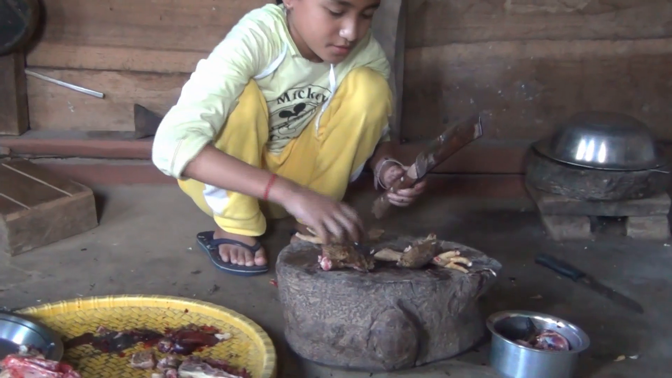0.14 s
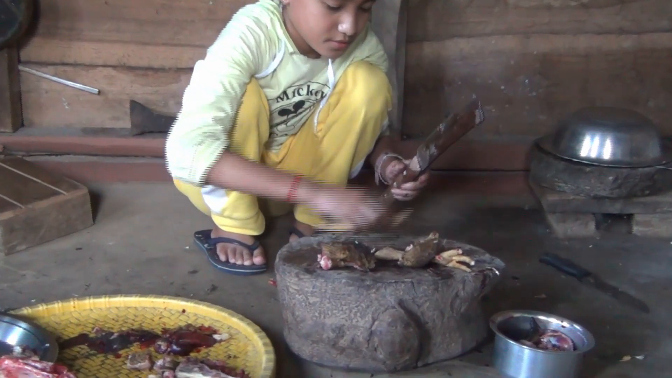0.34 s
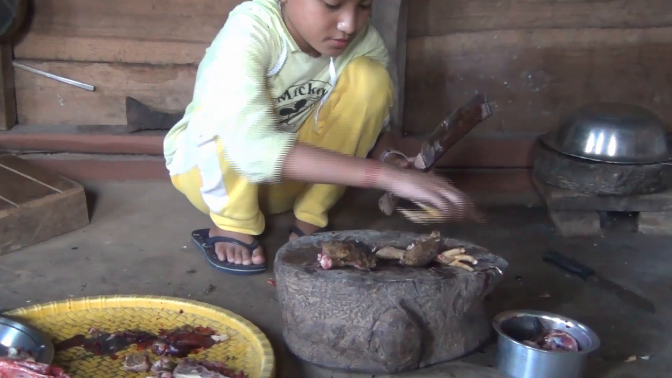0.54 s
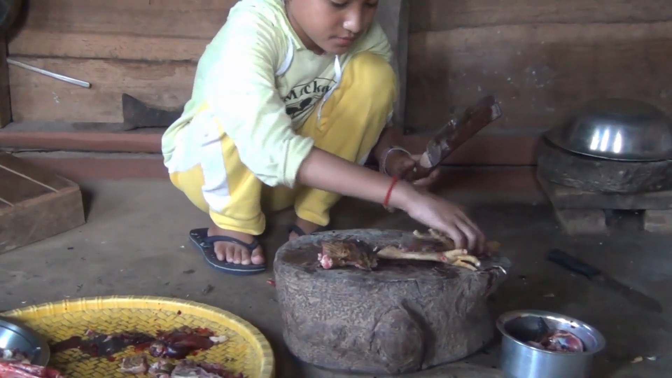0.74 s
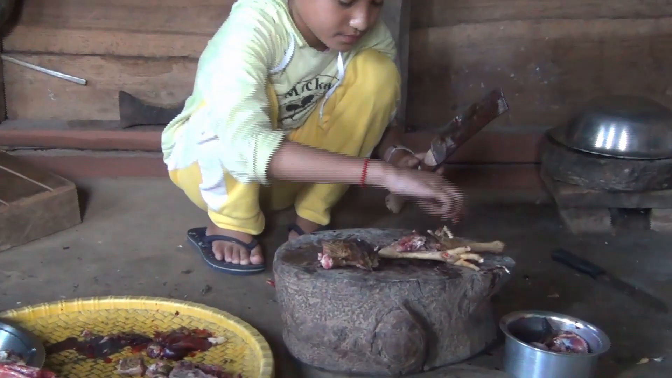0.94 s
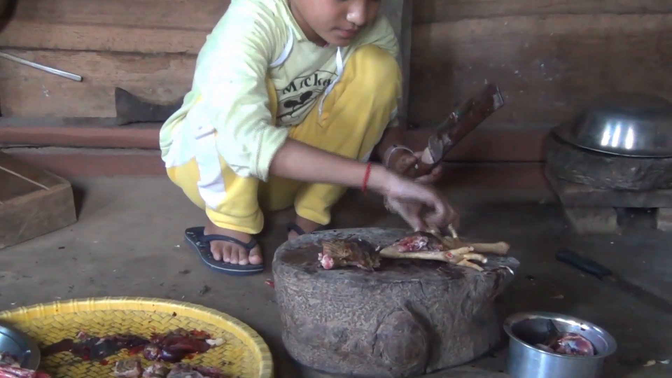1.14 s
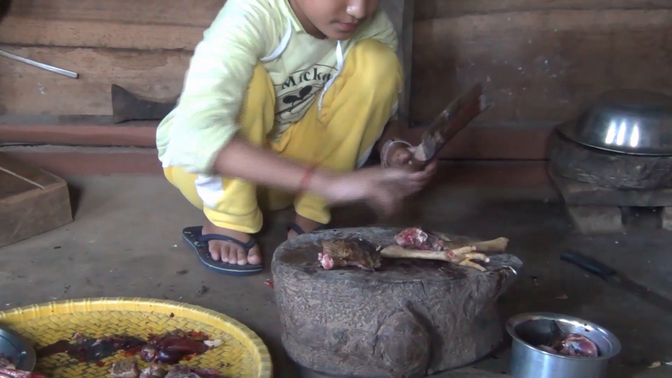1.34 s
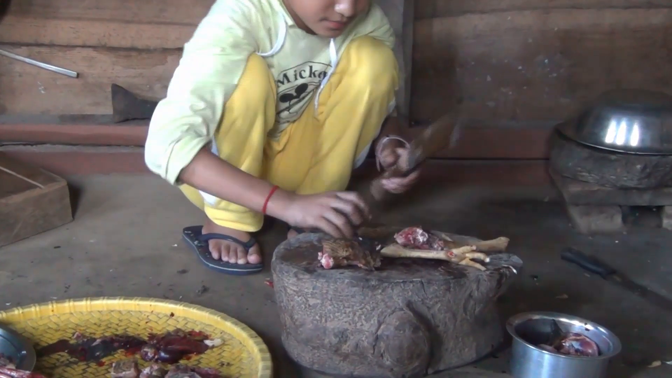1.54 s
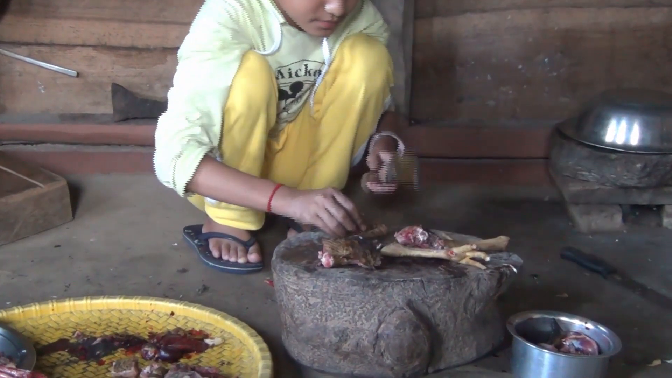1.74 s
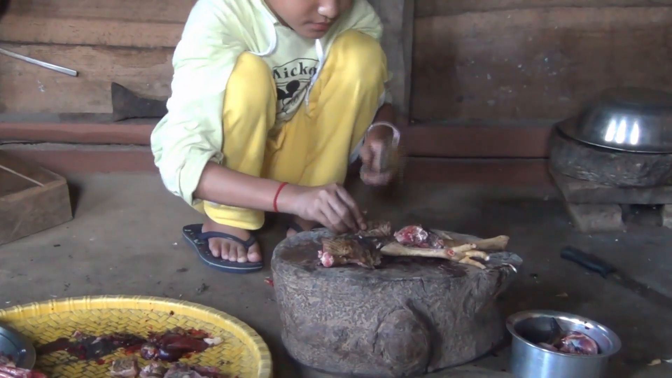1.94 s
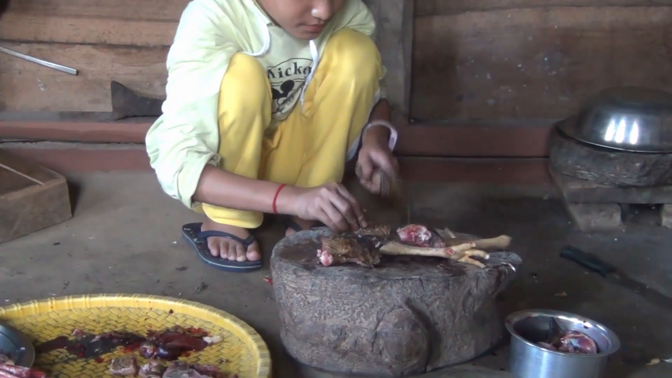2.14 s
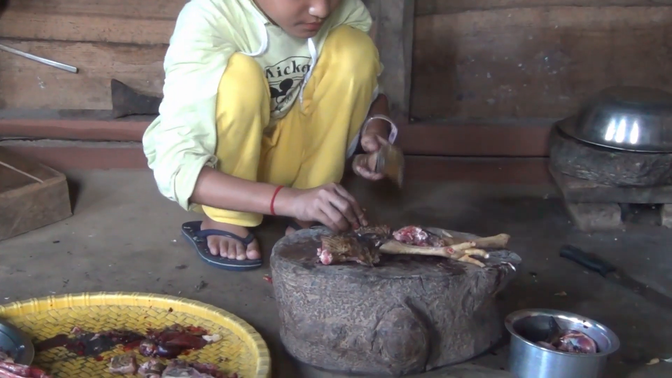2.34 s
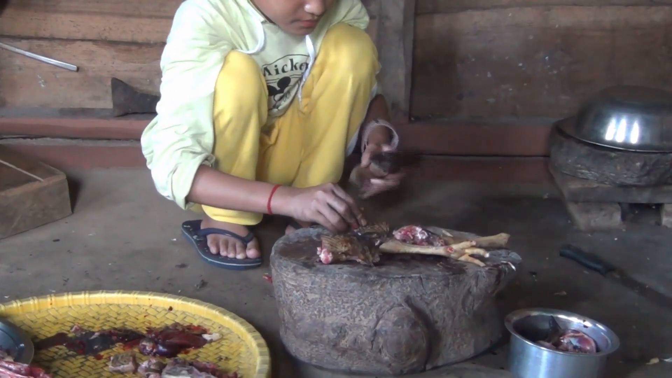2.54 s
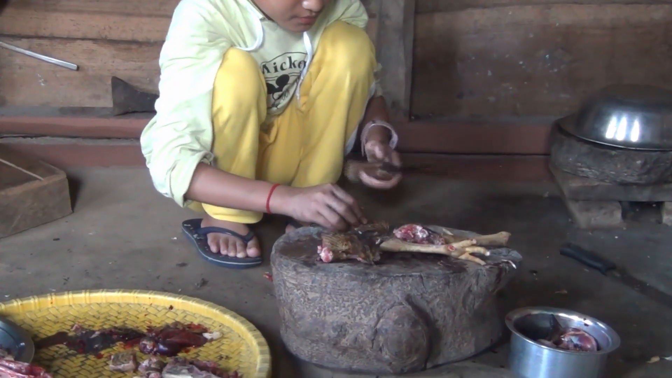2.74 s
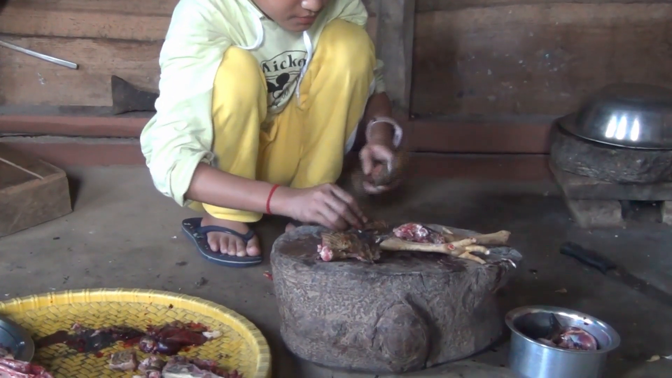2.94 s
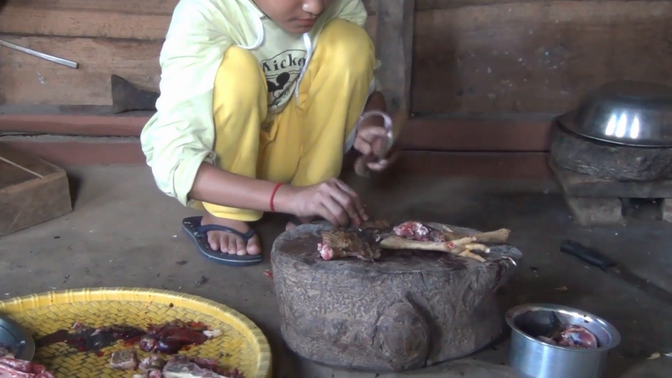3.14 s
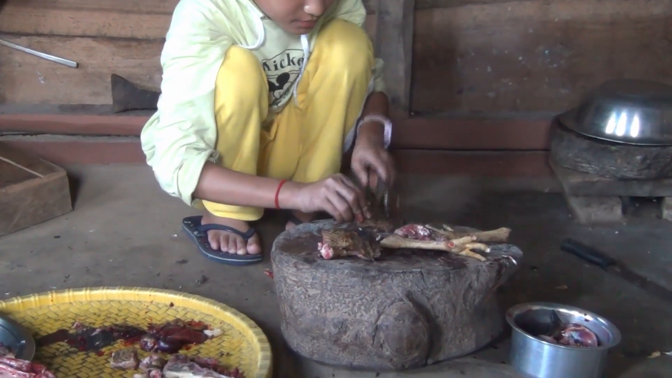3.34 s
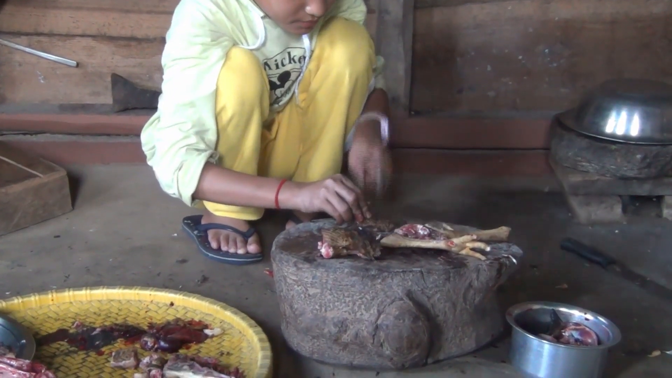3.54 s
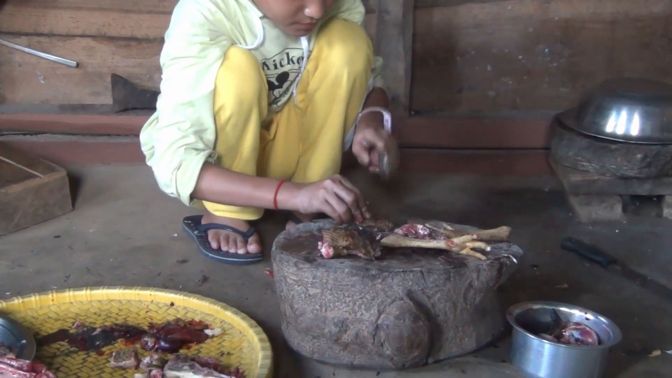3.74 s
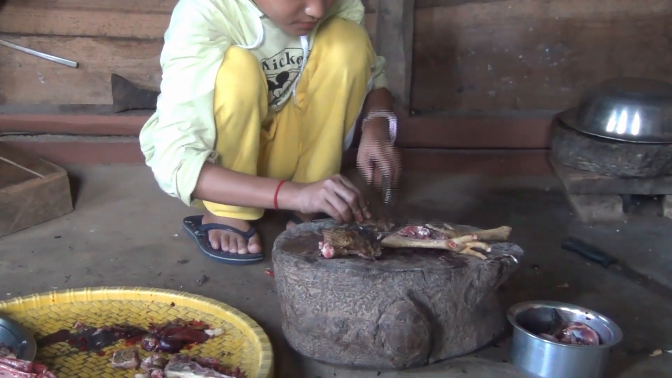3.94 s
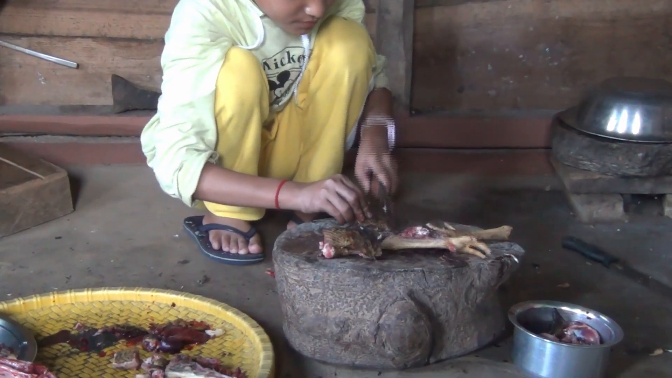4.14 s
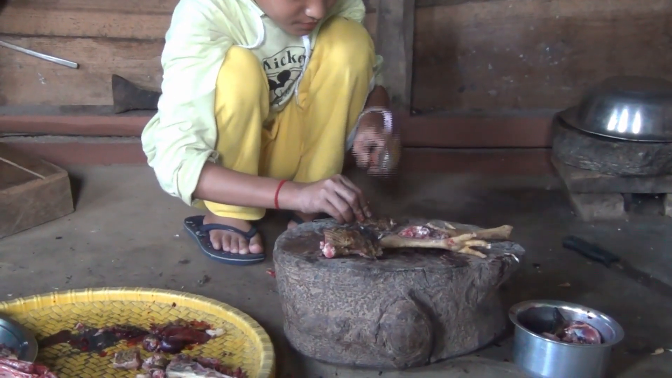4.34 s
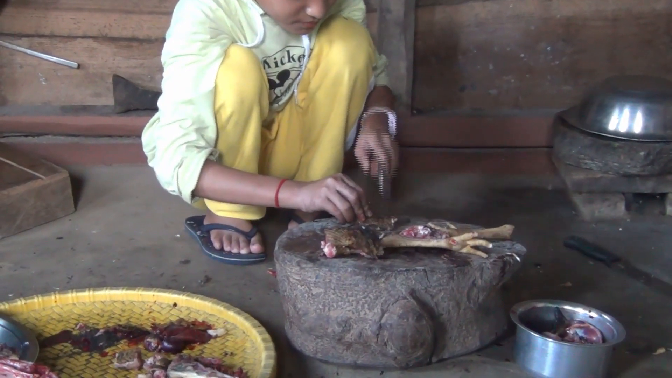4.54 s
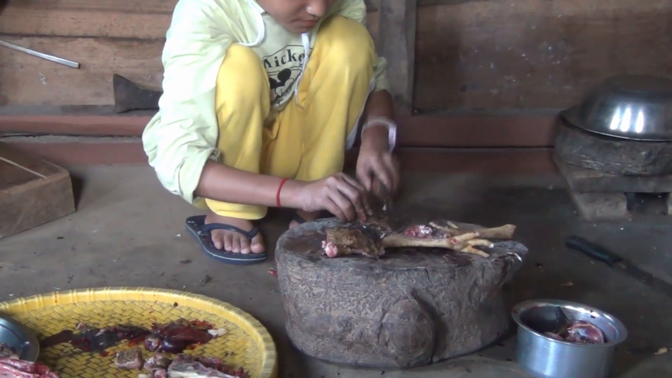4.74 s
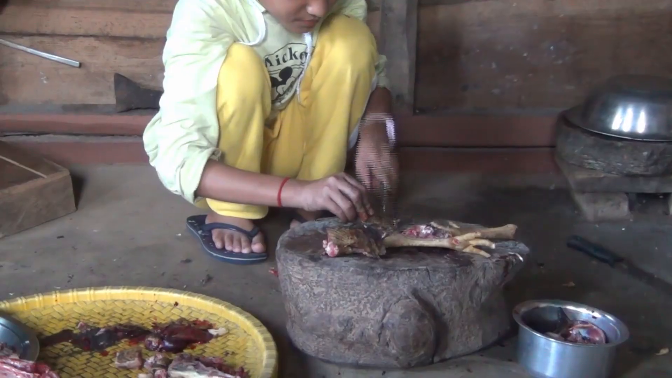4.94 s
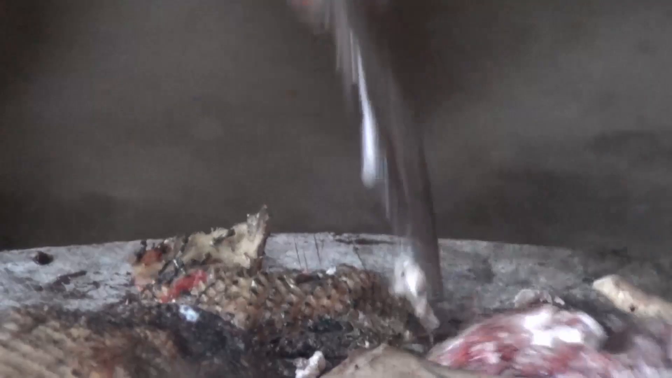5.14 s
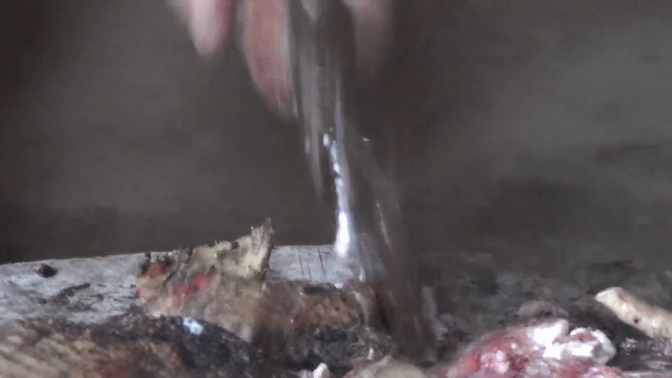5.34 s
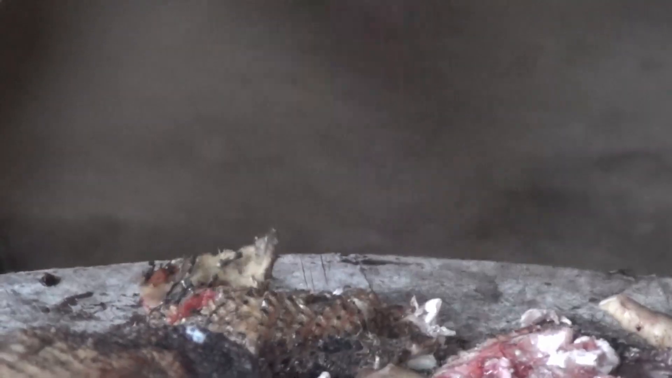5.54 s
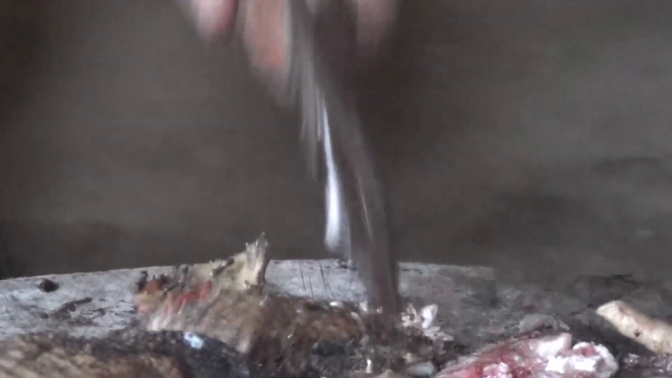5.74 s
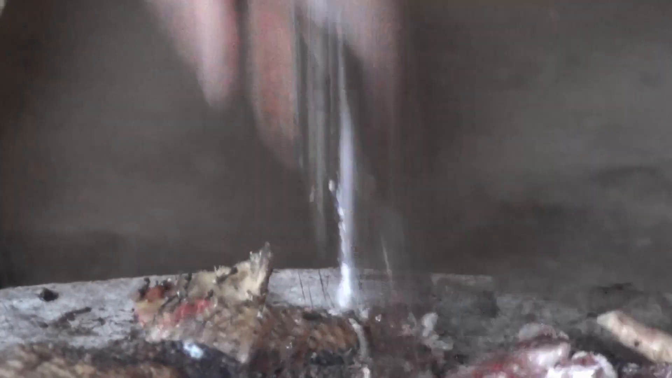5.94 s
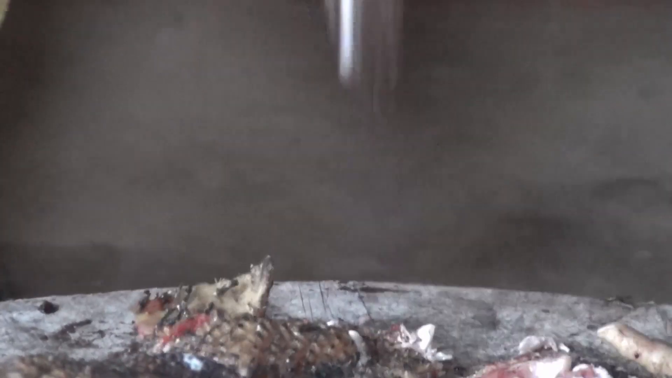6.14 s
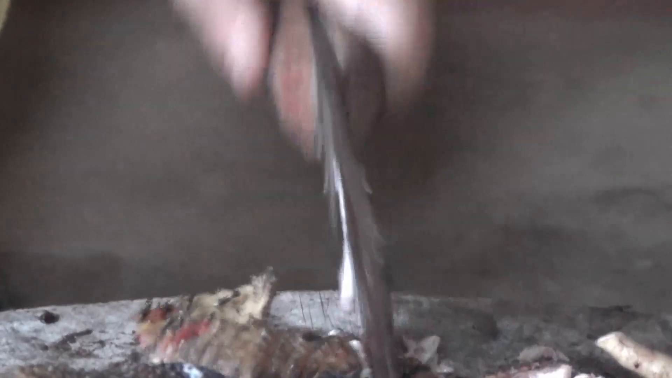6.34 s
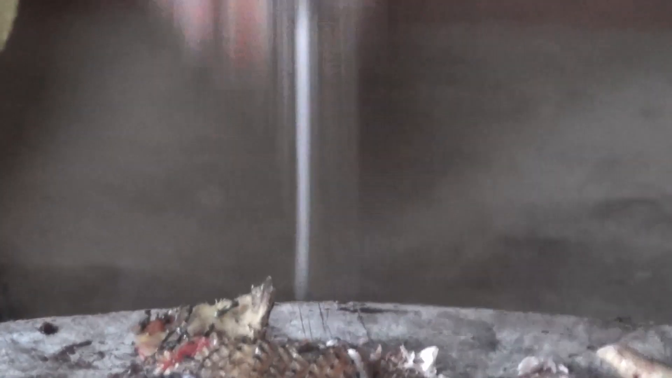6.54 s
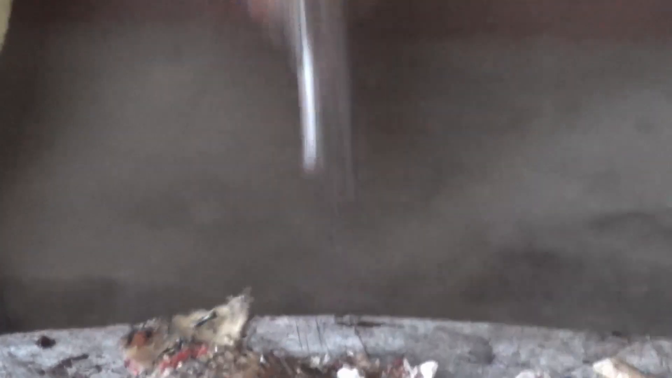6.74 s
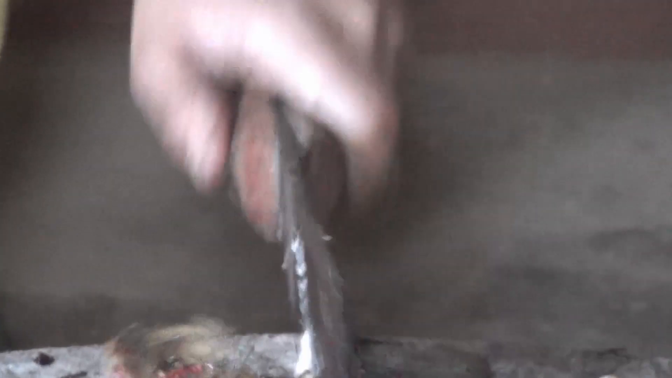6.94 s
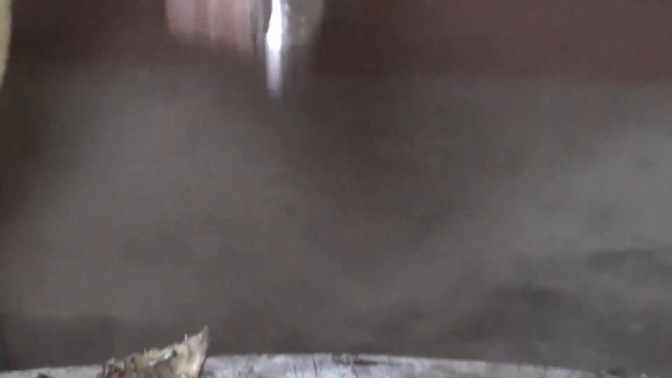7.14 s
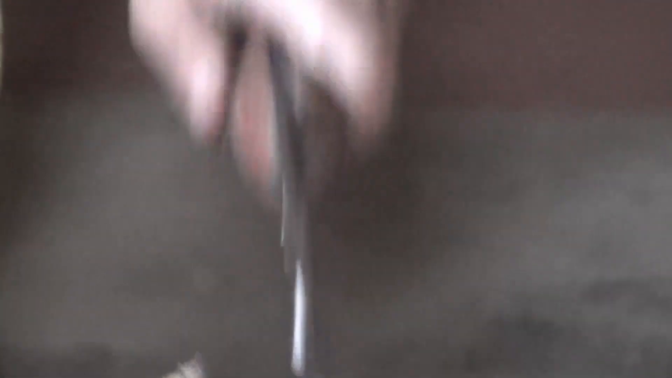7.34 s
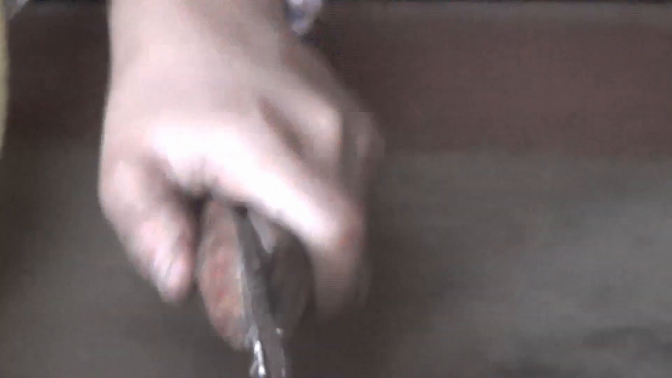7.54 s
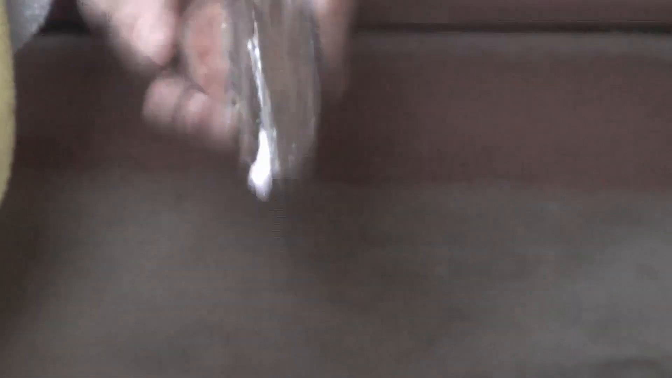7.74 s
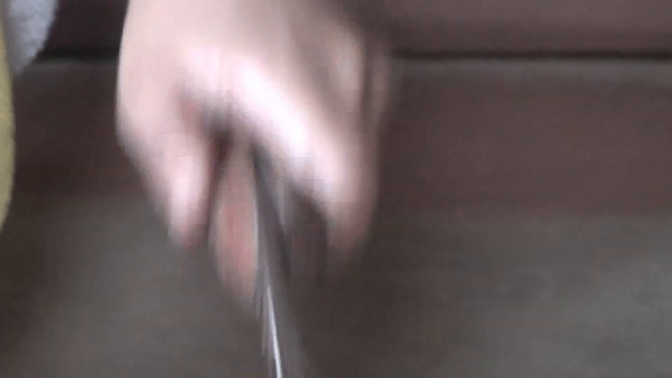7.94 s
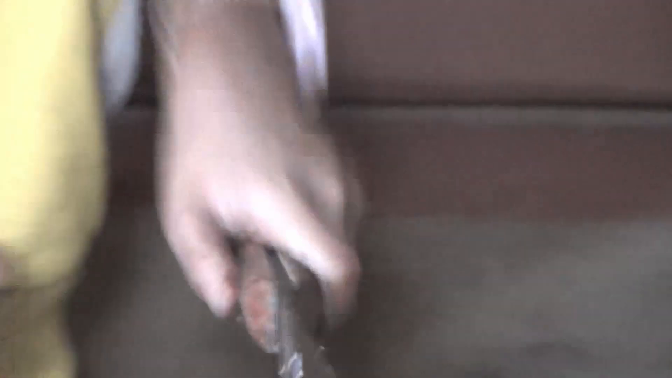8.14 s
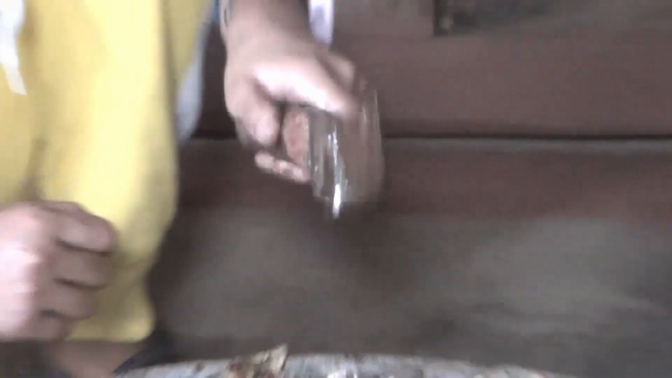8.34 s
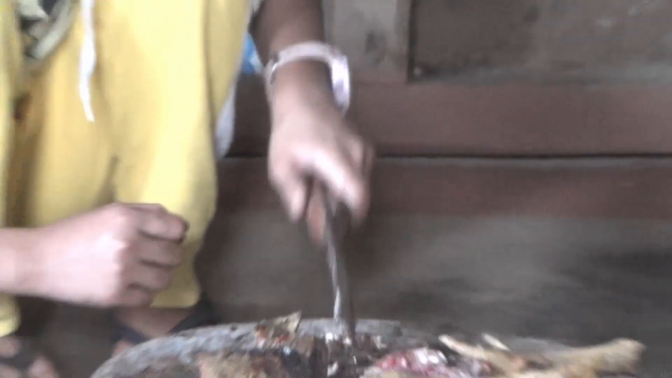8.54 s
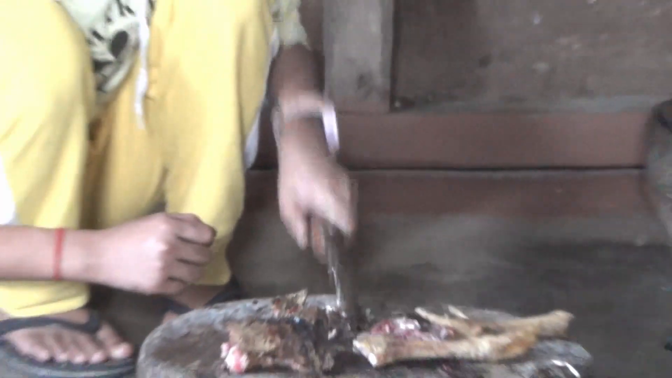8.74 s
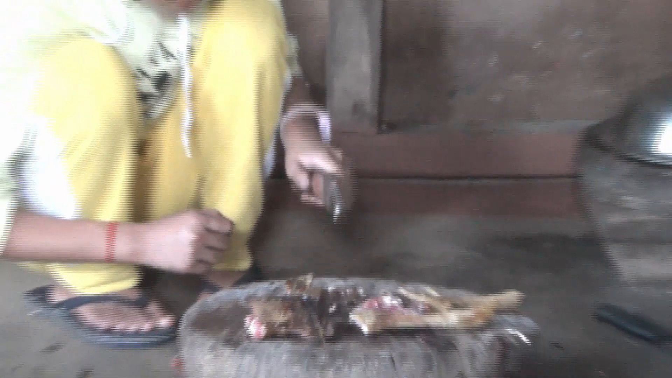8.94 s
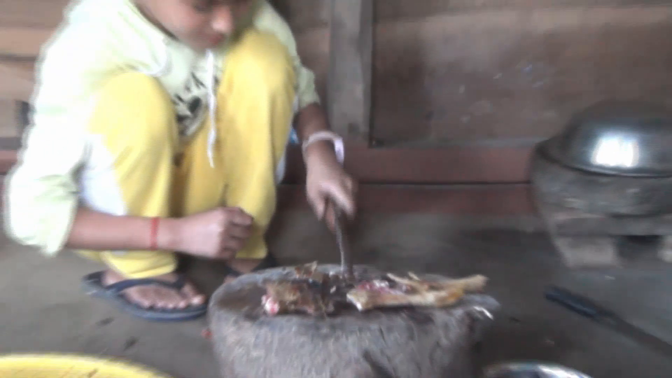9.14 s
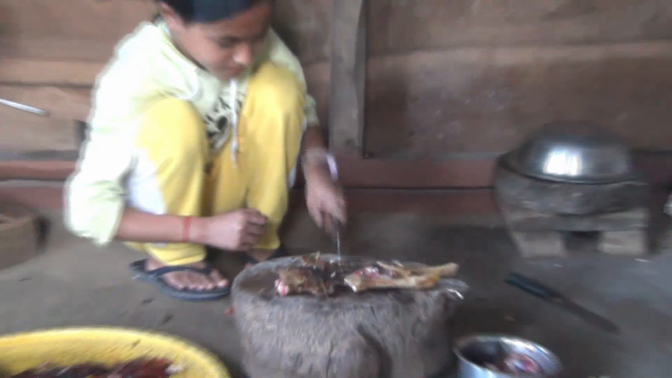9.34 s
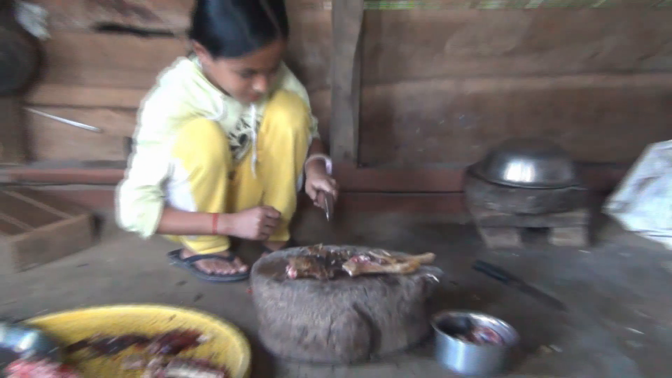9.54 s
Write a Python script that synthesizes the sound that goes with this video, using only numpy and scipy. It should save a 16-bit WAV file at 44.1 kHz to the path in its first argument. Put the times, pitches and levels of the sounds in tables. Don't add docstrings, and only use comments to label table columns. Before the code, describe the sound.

A heavy knife chops meat and bone on a wooden stump in steady, cracking blows, echoing off plank walls, with cicadas droning outside.

```python
import sys
import numpy as np
from scipy import signal
from scipy.fft import rfft, irfft, next_fast_len
from scipy.io import wavfile
from scipy.ndimage import uniform_filter1d, map_coordinates

SR = 44100
rng = np.random.default_rng(int(sys.argv[2]) if len(sys.argv) > 2 else 0)


def output_pcm(signal):
    pcm = np.clip(np.atleast_2d(signal).T, -1, 1) * 32767
    wavfile.write(sys.argv[1], SR, np.round(pcm).astype(np.int16))


def gain_from_db(level_db):
    decades = np.asarray(level_db, float) / 20
    return 10 ** decades


N = 423620

# start in seconds, crack peak in dB, how hard the edge meets the wood in dB,
# how brittle the cut is in dB, how flat the blade lands in dB.
CHOPS = [(2.0807, -12, 8, -14, 1), (3.3176, -10.5, -14.5, 2.5, -2.5), (3.6277, -6, -22, -8, 3.5),
         (3.909, -15, -10.5, -5.5, -3), (4.1945, -11.5, -5.5, 1.5, 0.5), (4.4661, -6, -29.5, -2, 4),
         (4.7494, -19, 6.5, -3.5, 0.5), (5.016, -13, -8, 2.5, -4), (5.141, -29.5, 6.5, -9, -13),
         (5.3921, -19.5, 0.5, -3, -7.5), (5.7011, -12.5, 1.5, -4, 4), (6.001, -24, 9.5, 7, 2),
         (6.3126, -7.5, 1.5, -5.5, -2), (6.622, -17, -12.5, 0, 3.5), (6.94, -14.5, -8, 2.5, 1),
         (7.2568, -11.5, -18, 3, 2.5), (7.5567, -11, -18.5, 2, -3.5), (7.8715, -10.5, -11, 1, 1.5),
         (8.1865, -10, 1.5, -3, -3), (8.4835, -9.5, -2, -1.5, -0.5), (8.806, -10.5, 0, 3, -1),
         (9.1002, -8, 1, -4, -3.5), (9.4194, -12.5, 7, -7, 2)]
BLOW_HZ = [200, 680, 1700, 4000, 10000]
# pitch in Hz, level in dB, t60 in seconds.
STUMP = [(150, 1, .1), (193, 10, .17), (255, -2, .42), (346, -1, .22), (390, 3, .22), (468, 0, .22),
         (534, 1.5, .2), (625, -4, .22), (673, -3, .22), (728, 0, .19), (800, -4, .2), (905, -8, .2),
         (964, -3, .22), (1028, -8, .25), (1097, -7, .2)]
# pitch in Hz, level in dB, t60 in seconds.
BLADE = [(1773, 14.5, 0.041), (2916, -36, 0.24), (3750, 18, 0.033), (7510, 10.5, 0.015),
         (10180, 17.5, 0.023), (14000, -27, 0.074)]
# delay in seconds, level in dB.
WALLS = [(.0075, -9), (.0135, -1), (.0205, -5), (.028, -8), (.035, 0), (.047, -9)]
# frequency in Hz, t60 in seconds.
HUT_DECAY = [(100, 0.69), (300, 0.82), (1000, 0.25), (3000, 0.21), (7000, 0.19), (14000, 0.19)]
# frequency in Hz, level in dB.
HUT_WET = [(100, -4), (300, 0), (600, 3), (1000, 7), (1500, 10), (2500, 11), (6000, 10), (14000, 9)]
# start in seconds, peak in dB, pitch in Hz,
# low push in dB.
TICKS = [
    (1.4245, -27.5, 1440, 0),
    (4.699, -31.5, 1230, -15),
    (4.9471, -15, 1290, -2.5),
    (4.9734, -21.5, 2580, -14),
    (5.129, -19.5, 1630, -2),
    (6.761, -35, 1070, -48),
    (9.381, -35, 3900, -19),
]
# centre in seconds, spread in seconds, level in dB.
RUSTLES = [
    (.87, 0.0016, -41),
    (2.55, 0.024, -48),
    (2.705, .012, -42.5),
    (3.05, 0.022, -51),
]
# start in seconds, end in seconds, pitch in Hz, level in dB.
FLIES = [
    (.95, 1.5, 166, -54),
    (1.05, 1.55, 214, -52),
    (1.75, 1.95, 104, -50),
    (.17, .33, 110, -50),
    (3.33, 3.62, 197, -55),
]
# pitch in Hz, width in Hz, level in dB.
CHORUS = [(4525, 720, -4), (4817, 500, -3.5), (4710, 1130, -13.5), (7290, 160, -17.5), (7320, 1560, -14),
          (8230, 430, -22)]
# frequency in Hz, density in dB per Hz.
YARD = [(15, -39), (25, 4.5), (70, -25), (108, 0), (211, -2), (448, -7), (804, -8.5), (3700, -16),
        (5900, -24), (9000, -25.5), (11500, -26), (14700, -29), (14900, -36), (15700, -28), (15900, -75)]
# centre in seconds, spread in seconds, lift in dB.
SWELLS = [
    (0, 0.42, 2.5),
    (1.4, 0.22, 2),
    (3.4, 0.71, 2.5),
    (9.6, 2, 4.5),
]
STARVED = [.421, .463, 1.125, 1.914, 2.191, 2.233, 2.489, 2.768, 3.3, 5.0, 5.22, 6.458, 6.695, 6.968, 7.076,
           7.355, 7.674, 8.571, 8.786, 9.16, 9.5]

ARM_DB, ARM_PER_WOOD, ARM_PER_CRACK = -20, 0.22, 0.2
CLACK_DB, CLACK_PER_WOOD, CLACK_PER_BRITTLE = 6.5, 0.49, 0.18
VALLEY_HZ, VALLEY_DB, VALLEY_SHARE = 1350, -4, 0.36
OPEN_DB, FIRST_DIP_DB, RECOVER_S, CHOPPING_DB, CLOSE_S = -1.11, -3, 0.68, -11, .03
TRILL_DB, TRILL_START_S, TRILL_END_S, TRILL_FADE_DB_PER_S = -51.5, .55, 5.0, 22
RUMBLE_DB = -50


def unit(x):
    return x / np.sqrt(np.mean(x ** 2) + 1e-20)


def along(points, hz):
    f, v = np.transpose(points)
    return np.interp(np.log(hz + 1), np.log(f + 1), v)


def wobble(rate):
    knots = rng.standard_normal(int(N * rate / SR) + 4)
    return map_coordinates(knots, [np.arange(N) * rate / SR])


def filtered(x, response):
    m = next_fast_len(len(x) + 8192)
    return irfft(rfft(x, m) * response(np.fft.rfftfreq(m, 1 / SR)), m)[:len(x)]


def colour(points, size=4096):
    cep = irfft(np.log(gain_from_db(along(points, np.fft.rfftfreq(size, 1 / SR)))), size)
    cep[1:size // 2] *= 2
    cep[size // 2 + 1:] = 0
    return irfft(np.exp(rfft(cep)), size)


def bands(modes):
    return lambda f: sum(gain_from_db(db) / (1 + (2 * (f - hz) / width) ** 4) for hz, width, db in modes)


def blow_colour(db, knock_db, sizzle_db, flat_db):
    thump_db = ARM_DB - (1 - ARM_PER_CRACK) * db + ARM_PER_WOOD * (db + knock_db)
    clack_db = CLACK_DB + CLACK_PER_WOOD * knock_db + CLACK_PER_BRITTLE * sizzle_db + flat_db
    levels = [thump_db + 12.0, knock_db + 14.5, clack_db - 0.5, 0, sizzle_db - 2]
    edges = [(50, thump_db - 42), (120, thump_db + 18.5), (420, knock_db + 6.5), (1000, knock_db + 8.5),
             (15000, sizzle_db - 6.5), (16000, sizzle_db - 50), (16500, sizzle_db - 32)]
    valley_db = VALLEY_DB + VALLEY_SHARE * levels[1] + (1 - VALLEY_SHARE) * levels[2]
    return colour(sorted([*edges, (VALLEY_HZ, valley_db), *zip(BLOW_HZ, levels)]))


def knife():
    out, t, lead = np.zeros(N + SR), np.arange(SR // 2) / SR, SR // 100
    echoes = gain_from_db(-15) * walls(t)
    for s, db, knock_db, sizzle_db, flat_db in CHOPS:
        shape = blow_colour(db, knock_db, sizzle_db, flat_db)
        noise = rng.standard_normal((2, len(t)))
        crack = noise[0] * (t / 0.0004) * np.exp(1 - t / 0.00072)
        splinters = filtered(crack, lambda f: f ** 2 / (f ** 2 + 1200 ** 2))[:300]
        splinters *= .4 / np.linalg.norm(splinters)
        splinters[0] += .9
        answer = gain_from_db(-24) * signal.fftconvolve(hut(t), splinters)[:len(t)]
        answer += echoes
        answer += gain_from_db(-29) * ring(STUMP, t, scatter_db=2, rise=.002)
        answer += gain_from_db(-33.5) * ring(BLADE, t, scatter_db=3.5, rise=0.00015)
        slicing = gain_from_db(-8.5 - 60 * t[lead:0:-1] / 0.0041) * noise[1, :lead]
        blow = np.r_[slicing, gain_from_db(-11) * crack + answer]
        sound = signal.fftconvolve(blow, shape)[:len(t)]
        out[round(s * SR) - lead:][:len(t)] += gain_from_db(db + 11.5) * sound
    return out[:N]


def ring(modes, t, scatter_db, rise):
    body = 0
    for hz, db, t60 in modes:
        level_db = db + scatter_db * rng.standard_normal()
        body = body + gain_from_db(level_db - 60 * t / t60) * np.sin(2 * np.pi * hz * t)
    return body * (1 - np.exp(-t / rise))


def walls(t):
    bump = lambda delay, width: np.exp(-.5 * ((t - delay) / width) ** 2) / width
    return sum(gain_from_db(db) * .0004 * (bump(delay, .00028) - bump(delay, .0008)) for delay, db in WALLS)


def hut(t):
    hz, s, z = signal.stft(rng.standard_normal(len(t)), SR, nperseg=256)
    level_db = along(HUT_WET, hz)[:, None] - 60 * s / along(HUT_DECAY, hz)[:, None]
    tail = signal.istft(z * gain_from_db(level_db), SR, nperseg=256)[1][:len(t)]
    return tail * (1 - np.exp(-t / 0.0017))


def ticks():
    out, t = np.zeros(N + SR), np.arange(SR // 20) / SR
    for s, db, hz, push_db in TICKS:
        spit = gain_from_db(-60 * t / 0.026) * rng.standard_normal(len(t))
        click = filtered(spit, lambda f: bands([(hz, 900, 0), (2600, 2200, -3)])(f) + 0.018)
        push = gain_from_db(push_db - 60 * t / 0.017) * np.sin(2 * np.pi * 230 * t)
        out[round(s * SR):][:len(t)] += gain_from_db(db - 2.0) * (2.6 * click + push)
    return out[:N]


def rustles():
    t = np.arange(N) / SR
    puffs = sum(gain_from_db(db) * np.exp(-.5 * ((t - s) / spread) ** 2) for s, spread, db in RUSTLES)
    return puffs * unit(filtered(rng.standard_normal(N), bands([(8700, 8100, 0)])))


def flies():
    out, t = np.zeros(N), np.arange(N) / SR
    drift, waver_db = 1 + .01 * wobble(7), 1.5 * wobble(9)
    for start, end, hz, db in FLIES:
        fade = np.clip(np.minimum(t - start, end - t) / 0.013, 0, 1)
        phase = 2 * np.pi * np.cumsum(hz * drift) / SR
        out += gain_from_db(db + 3 + waver_db) * fade * np.sin(phase)
    return out


def cicadas():
    flutter = gain_from_db(.5 * wobble(14) + 1.2 * wobble(110) + .5 * wobble(3))
    return gain_from_db(-37.0) * unit(flutter * filtered(rng.standard_normal(N), bands(CHORUS)))


def trill():
    t = np.arange(N) / SR
    clicks_hz = 89 + 1.5 * wobble(5)
    gate = np.maximum(np.sin(2 * np.pi * np.cumsum(clicks_hz) / SR), 0) + .4
    falter_s = .095 * (t > CHOPS[1][0])
    bursts = np.cos(np.pi * (t - .46 - falter_s) / .2755) ** 4
    voice = unit(gate * filtered(rng.standard_normal(N), bands([(9440, 350, 0)])))
    outside_s = np.maximum(np.maximum(TRILL_START_S - t, t - TRILL_END_S), 0)
    return gain_from_db(TRILL_DB - TRILL_FADE_DB_PER_S * outside_s) * bursts * voice


def yard():
    z = signal.stft(rng.standard_normal(N), nperseg=512)[2]
    patches = uniform_filter1d(uniform_filter1d(rng.standard_normal(z.shape), 6, 0), 14, 1)
    air = signal.istft(z * gain_from_db(1.44 * unit(patches)), nperseg=512)[1][:N]
    air = gain_from_db(-37.0) * unit(filtered(air, lambda f: gain_from_db(along(YARD, f))))
    rumble = filtered(rng.standard_normal(N), bands([(112, 6.7, -1), (194, 170, -19.5), (343, 85, -9.5)]))
    t = np.arange(N) / SR
    swell_db = sum(db * np.exp(-.5 * ((t - s) / spread) ** 2) for s, spread, db in SWELLS)
    return air + gain_from_db(RUMBLE_DB + swell_db + 4.6 * wobble(7.3)) * unit(rumble)


def yard_level():
    t = np.arange(N) / SR
    since = np.maximum(t - CHOPS[0][0], 0)
    dip_db = FIRST_DIP_DB * np.clip(since / CLOSE_S, 0, 1) * np.exp(-since / RECOVER_S)
    closed_db = CHOPPING_DB * np.clip((t - CHOPS[1][0]) / CLOSE_S, 0, 1)
    return gain_from_db(OPEN_DB + dip_db + closed_db)


def steady_rumble():
    lumps = gain_from_db(1.5 * wobble(6))
    return gain_from_db(-51.0) * lumps * unit(filtered(rng.standard_normal(N), bands([(90.3, 68, 0)])))


def scene():
    close = knife() + ticks() + rustles() + flies() + steady_rumble()
    outside = cicadas() + trill() + yard()
    return (close + yard_level() * outside)[None]


def starved(x):
    hz, t, z = signal.stft(x, SR, nperseg=1536, noverlap=1152)
    power = np.abs(z) ** 2
    nearest_s = np.min(np.abs(t[:, None] - STARVED), axis=1)
    thin = np.clip(1.6 - nearest_s / .011, 0, 1)
    held = uniform_filter1d(power, size=3, axis=1)
    strong = held > 1.7 * uniform_filter1d(held, size=41, axis=0)
    loud = power.sum(0) > 4 * np.median(power.sum(0))
    gain = np.where(strong & (hz < 9800)[:, None], 1.5, np.where(loud, .05, .25))
    keep = 1 + (gain - 1) * thin * (hz > 1100)[:, None]
    return signal.istft(z * keep, SR, nperseg=1536, noverlap=1152)[1][:N]


def low_pass(x):
    return signal.sosfilt(signal.butter(12, 16480, fs=SR, output="sos"), x)


def record(dry):
    x = dry / (1 + np.abs(dry / 1.05) ** 8) ** (1 / 8)
    x = filtered(starved(x[0]), lambda f: (f < 16400) * f ** 2 / (f ** 2 + 30 ** 2))
    return low_pass(x[None])


dry = scene()
out = record(dry)
output_pcm(out)
```